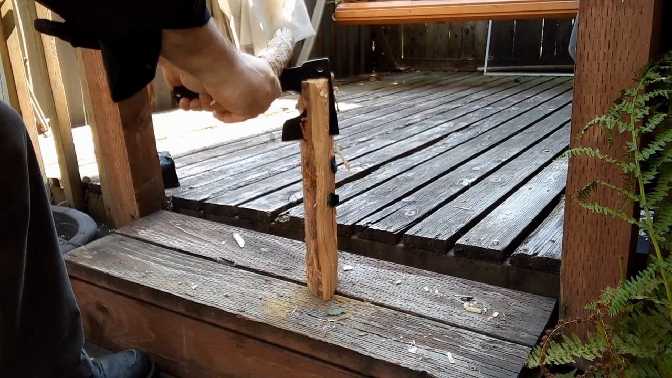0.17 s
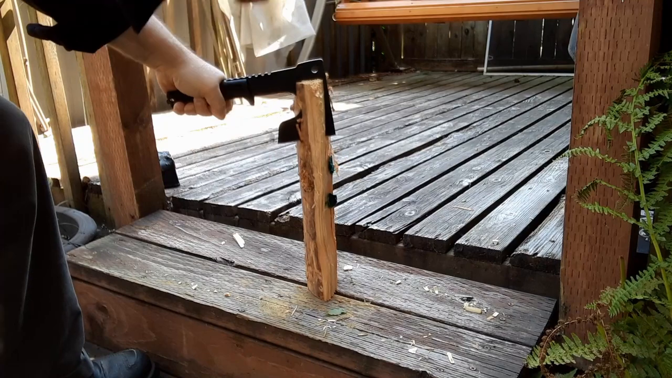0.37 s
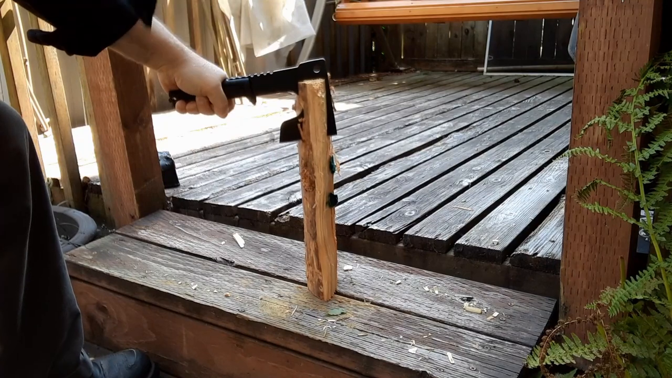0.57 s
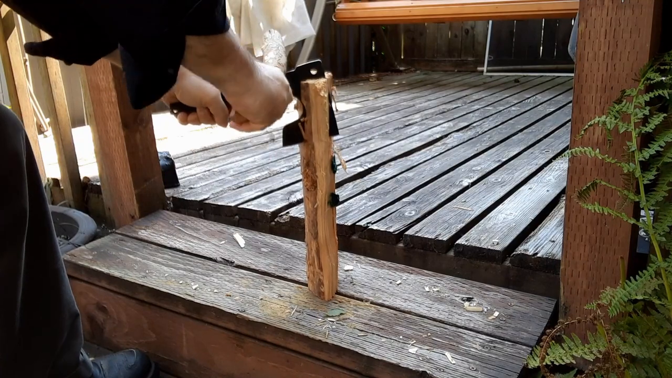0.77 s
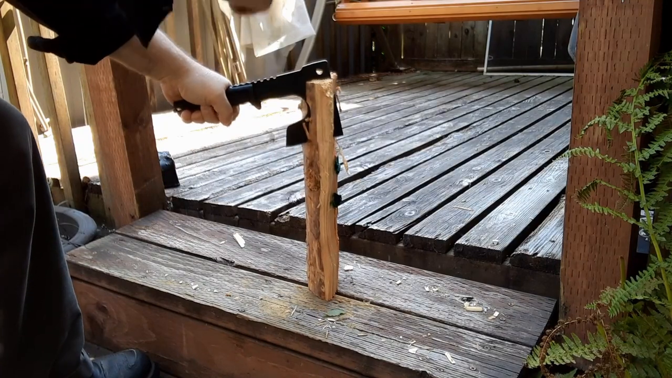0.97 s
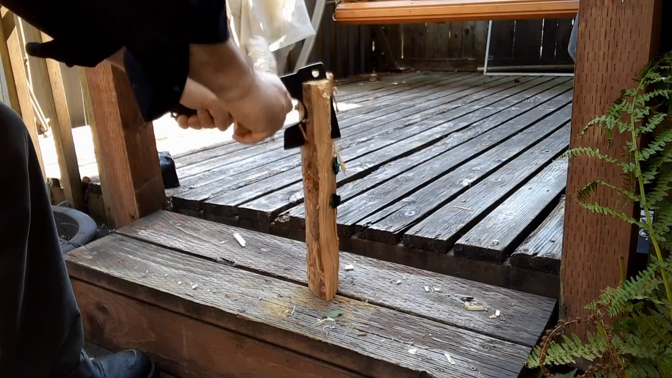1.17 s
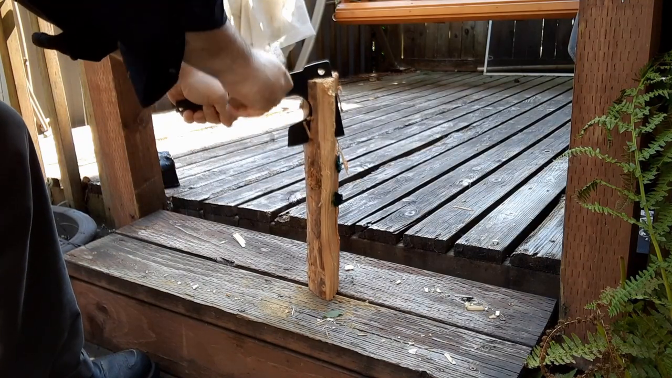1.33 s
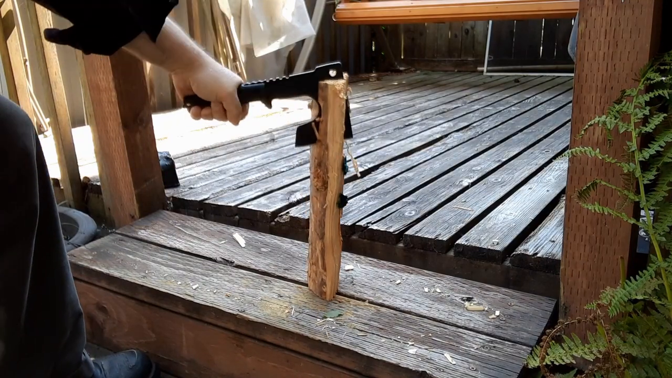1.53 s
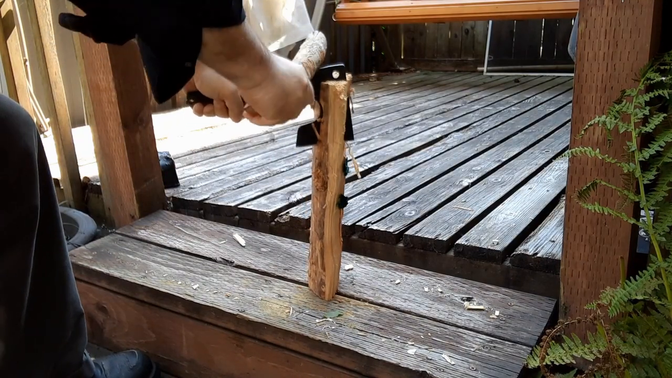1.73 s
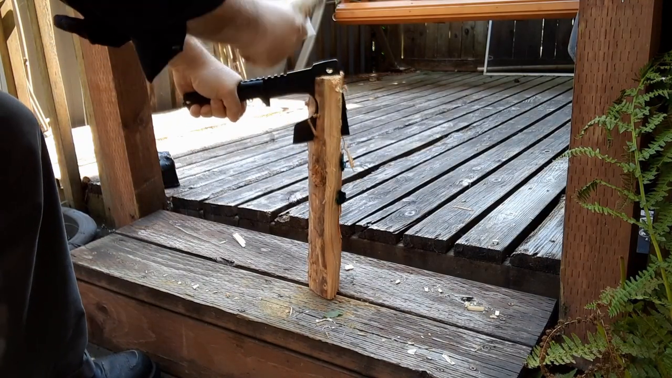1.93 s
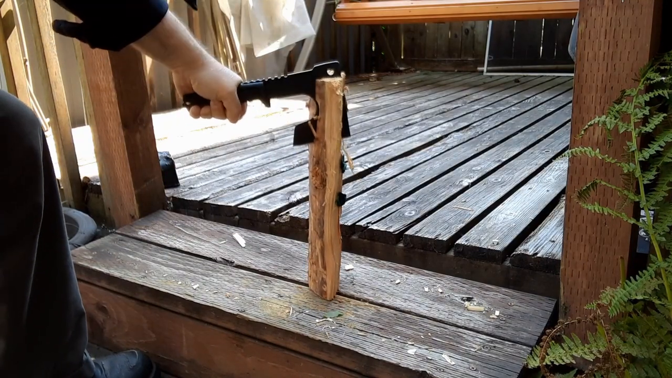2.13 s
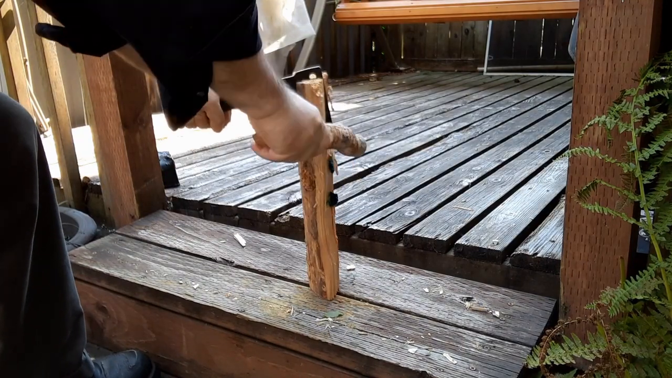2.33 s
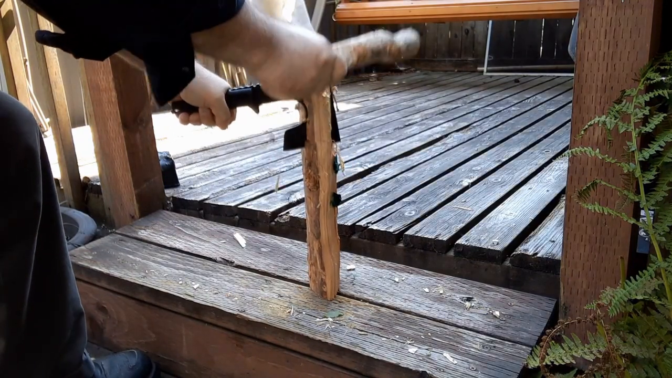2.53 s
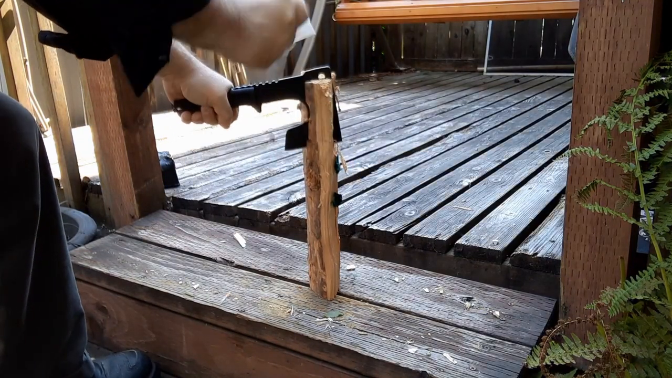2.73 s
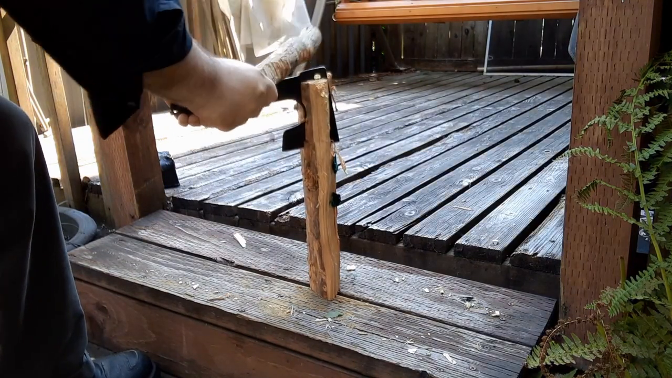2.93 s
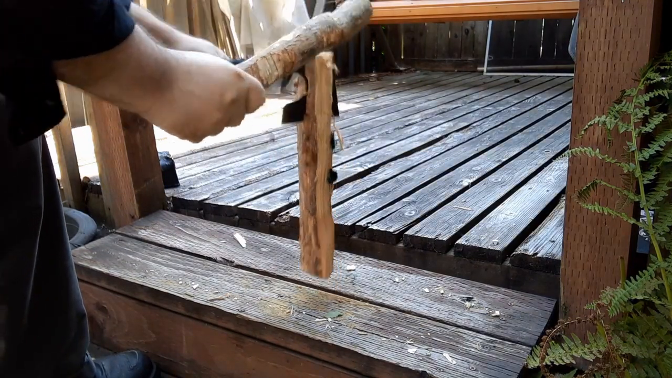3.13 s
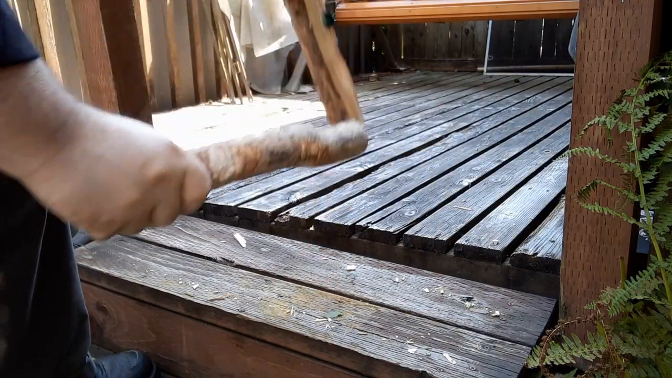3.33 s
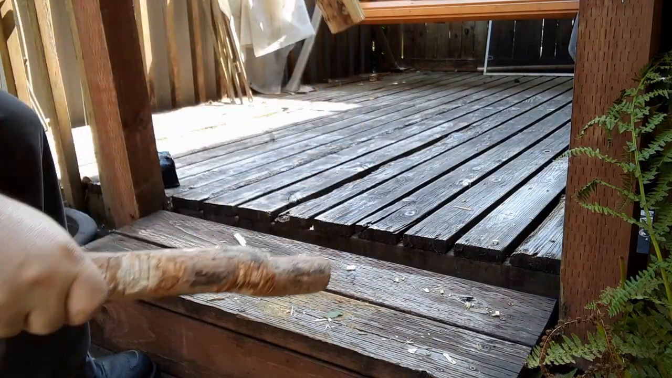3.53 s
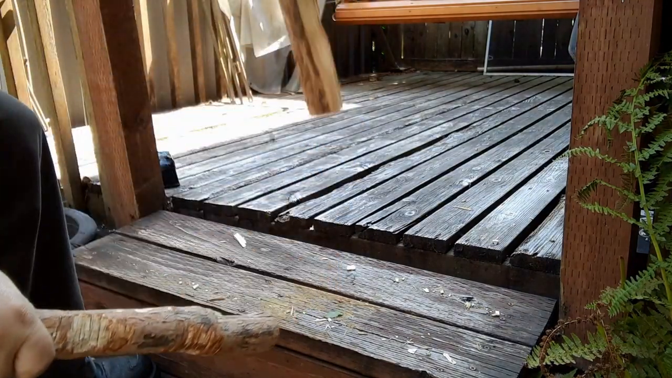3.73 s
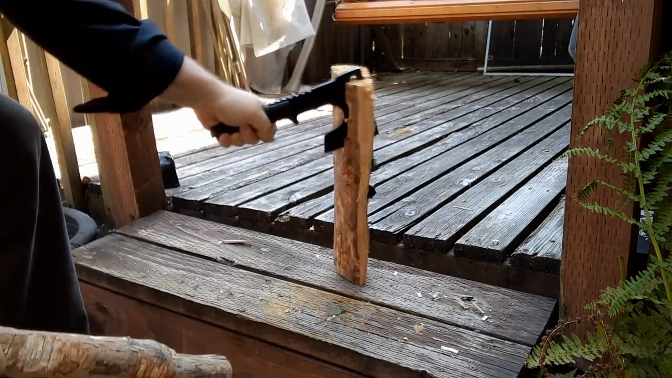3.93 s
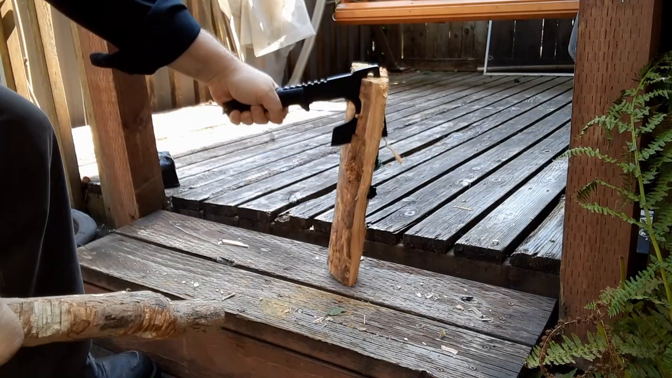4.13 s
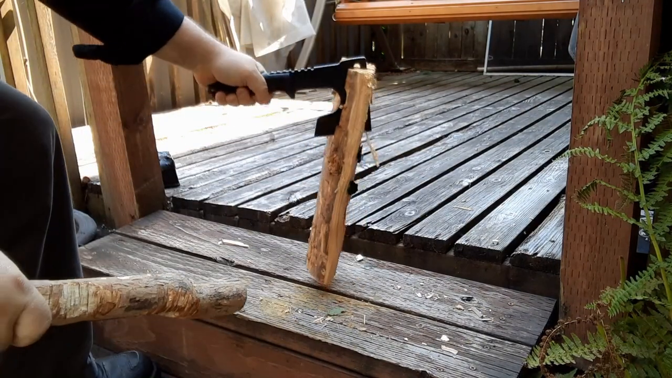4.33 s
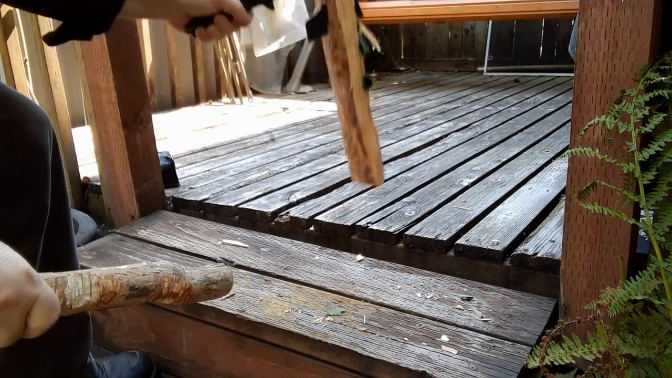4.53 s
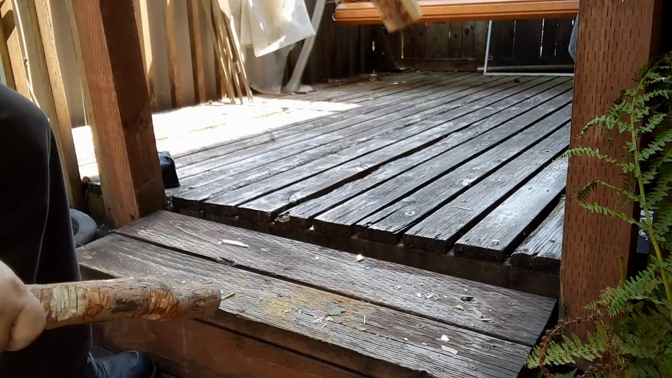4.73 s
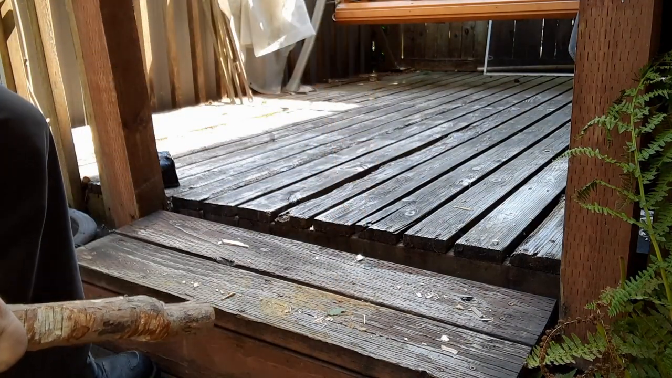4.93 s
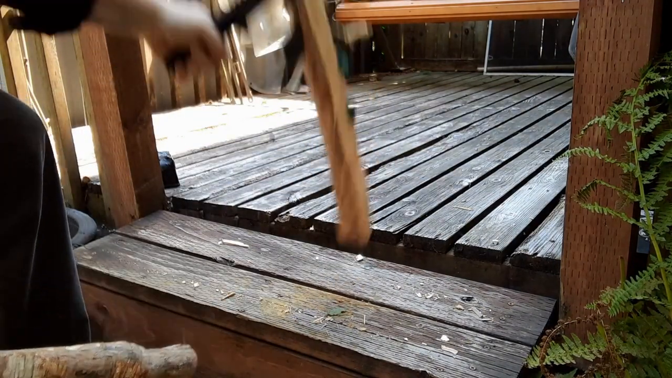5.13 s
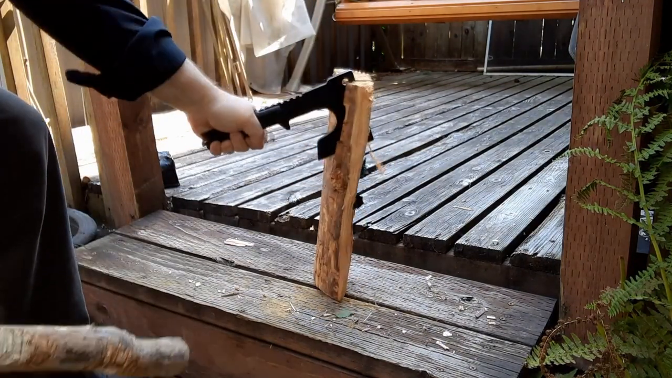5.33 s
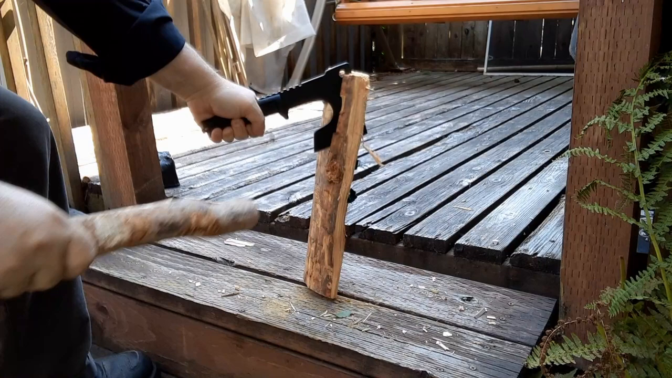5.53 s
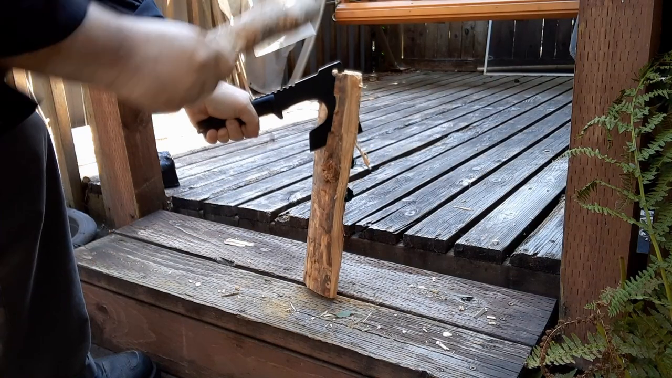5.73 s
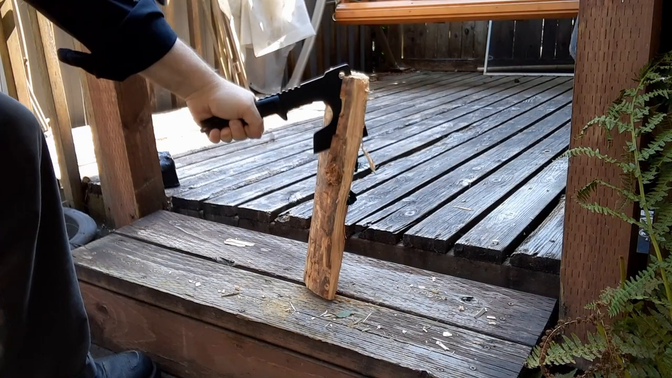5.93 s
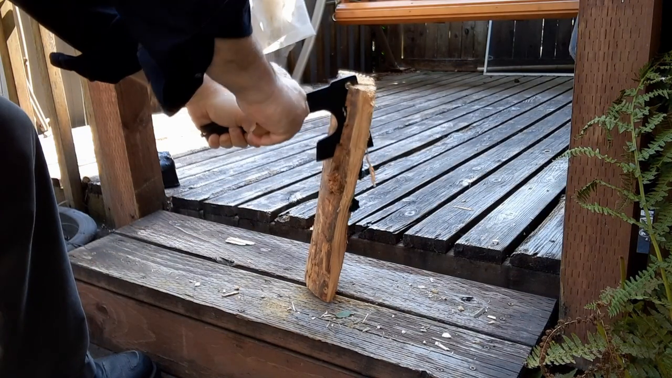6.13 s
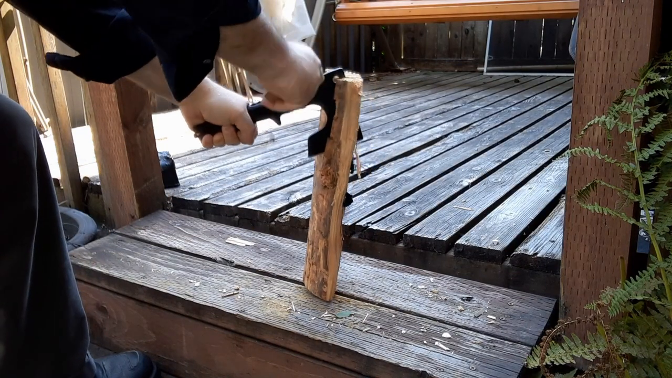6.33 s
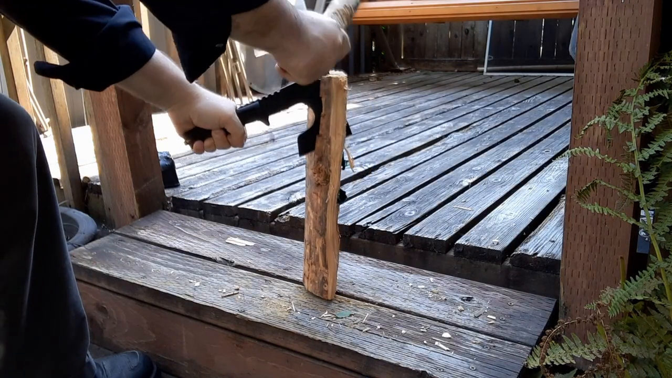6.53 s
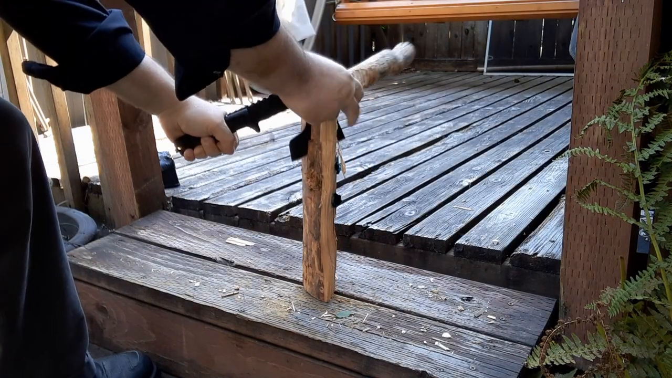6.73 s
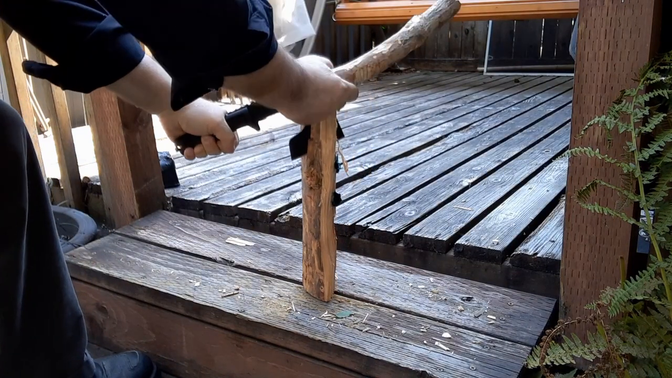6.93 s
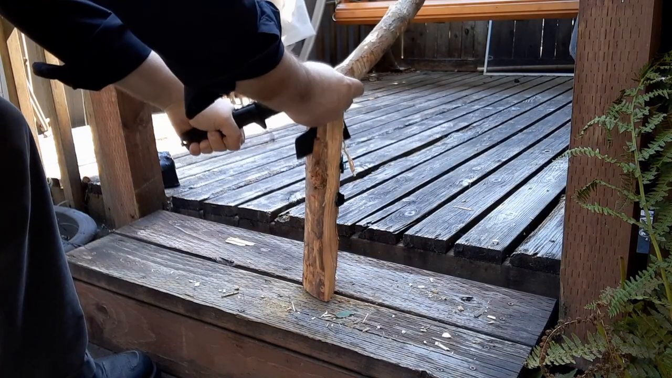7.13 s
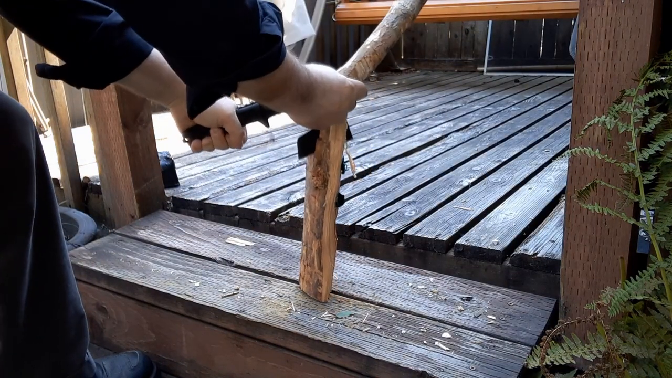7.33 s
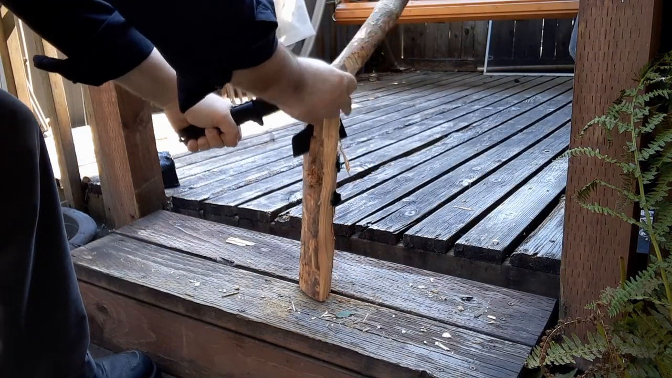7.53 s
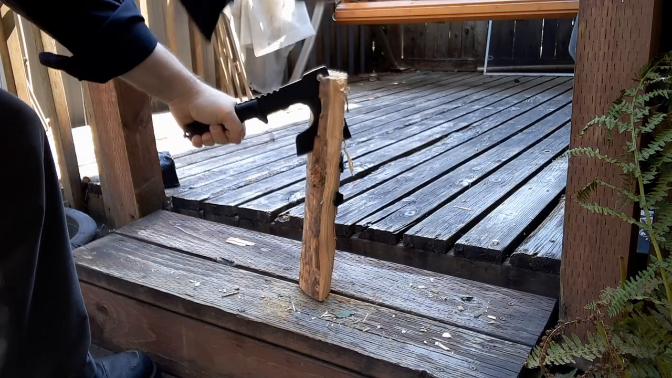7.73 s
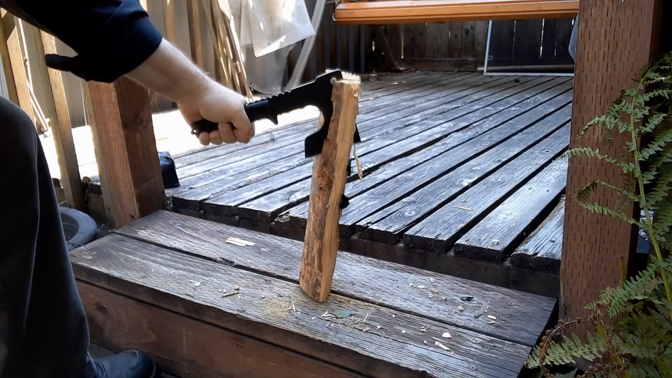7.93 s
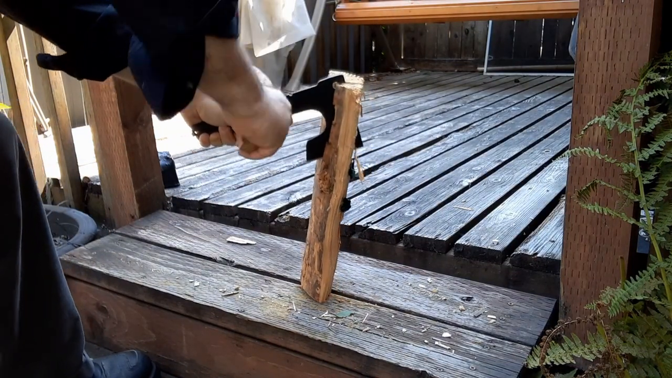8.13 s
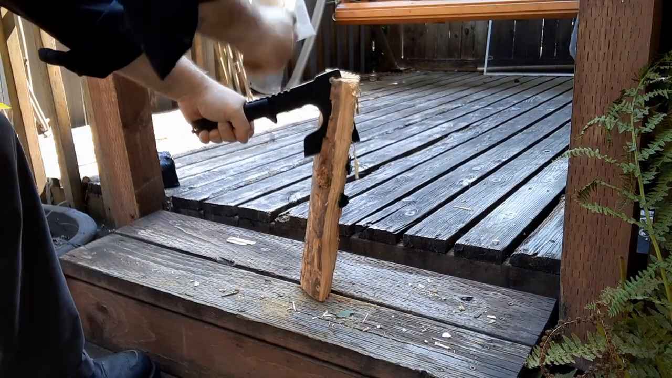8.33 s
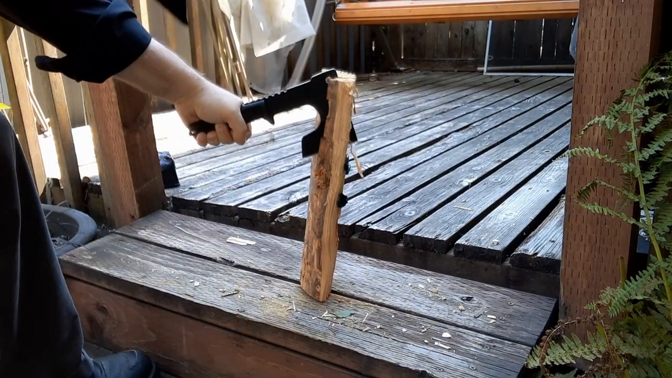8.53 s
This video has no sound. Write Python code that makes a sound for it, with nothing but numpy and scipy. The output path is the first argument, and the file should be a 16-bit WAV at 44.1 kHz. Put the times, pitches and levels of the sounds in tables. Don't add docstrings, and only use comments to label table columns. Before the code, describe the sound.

Outdoors at a hollow porch step, heard close on a small stereo camera. A branch beats a hatchet into an upright softwood stick: hard, dry clacks with cracking fibres and a low board boom at 0.2, 0.8, 1.3, 1.8, 2.4 and 2.9 s. The first three are loudest and the later ones duller; light taps of the rebounding branch follow, firmest at 2.5, and a stick knock joins the 2.4 blow. Splinters snap brightly at 2.65, 3.1 and 3.65. At 4.0 the stick end drops with a hollow knock and small bounces, then again at 5.3, pattering out by 5.6. Another blow lands at 6.2, small ticks and rustles follow, a sharp snap at 8.0, and a last strong clack at 8.25 with a tiny tap. Faint traffic hiss and low engine drone continue throughout, the drone swelling after 7 s. Echoes are short, with a faint yard tail.

```python
import sys
import numpy as np
from scipy import signal
from scipy.fft import rfft, irfft, next_fast_len
from scipy.io import wavfile
from scipy.ndimage import uniform_filter1d, map_coordinates

SR = 44100
rng = np.random.default_rng(int(sys.argv[2]) if len(sys.argv) > 2 else 0)


def boost(x):
    u = np.asarray(x, float) / 20
    return 10 ** u


def file_out(sig):
    cols = np.atleast_2d(sig).T
    lim = np.clip(cols, -1, 1)
    pcm = np.round(lim * 32767).astype(np.int16)
    wavfile.write(sys.argv[1], SR, pcm)


N = 383226
SPAN = SR // 2

# [t/s, level/dB]
ENGINE_LEVEL = [(0.0, -58), (0.26, -47), (0.58, -52), (0.92, -52), (1.64, -63), (1.91, -55), (2.71, -58.5),
                (3.63, -43), (3.95, -47), (4.16, -55.5), (4.84, -66.5), (5.39, -53), (5.76, -62.5),
                (7.21, -36), (7.5, -34.5), (8.03, -37), (8.35, -45), (8.69, -47.5)]
# [f/Hz, width/Hz, level/dB]
ENGINE_ORDERS = [(90.9, 27, 0.5), (58, 16, -7.5), (175, 11, -17.5)]
# [t/s, level/dB]
TRAFFIC_LEVEL = [(0.0, -55), (1.62, -53.5), (3.34, -54), (4.09, -52), (4.33, -60), (4.55, -67),
                 (5.23, -65), (5.44, -52), (5.61, -61.5), (5.98, -66.5), (6.66, -59.5), (6.92, -53.5),
                 (7.96, -48.5), (8.28, -48), (8.45, -53), (8.69, -57)]
# [f/Hz, level/dB per Hz]
RUMBLE_COLOUR = [(20, -41), (35, -21), (60, 7), (110, -1.5), (180, -11.5), (300, -24), (500, -51)]
# [f/Hz, level/dB per Hz]
TYRE_COLOUR = [(120, -34), (200, -7.5), (265, -12), (400, -5.5), (1010, 0), (2580, -20), (3400, -37),
               (5000, -94.5)]
RUMBLE_DB, RUMBLE_DB_PER_S, GUST_DB = 9, -0.5, 3.5

# [t/s of the peak, level/dB, swell/s, fade/s]
RUSTLES = [(.425, -59, 0.018, 0.018), (.89, -44, .02, 0.026), (1.07, -65.5, 0.052, 0.033),
           (3.01, -51.5, 0.016, .03), (6.75, -71.5, .15, .2), (7.57, -66, .05, .04),
           (8.51, -72.5, .04, .15), (3.68, -61, 0.013, .12), (3.97, -67, 0.11, .02),
           (4.1, -64.5, .02, 0.13), (4.24, -65, 0.032, .04), (4.33, -69.5, .03, 0.11),
           (5.42, -65, .02, 0.038), (5.56, -61.5, .12, 0.036), (6.87, -72, .04, .03),
           (6.931, -64, 0.038, .02), (7.29, -75, 0.016, 0.13), (7.499, -56.5, 0.055, .04),
           (7.676, -44.5, 0.014, .02), (7.75, -60.5, 0.13, 0.038), (8.02, -62, 0.015, .03),
           (8.085, -71, .02, 0.013)]

# [t/s, peak level/dB, ping f/Hz, ping level/dB, left-right level/dB]
SPLINTERS = [(0.3924, -59, 2206, -7, -1), (1.6318, -46, 3040, 6.5, -3.5), (2.0144, -57, 2320, 18, -3),
             (2.6459, -26.5, 3420, -3.5, 2.5), (2.7252, -41.5, 3430, -1.5, 4),
             (3.0689, -26.5, 2880, -43, 1), (3.1822, -60, 2914, -17, 3), (3.6471, -21.5, 2810, -1, 1.5),
             (3.9534, -56, 3360, 15.5, -14), (5.4014, -63.5, 3350, 23.5, 14), (6.318, -51.5, 2650, 17, -2),
             (6.3899, -62, 2620, 9, -4), (6.8644, -62, 2710, 12, -15.5), (7.4505, -55, 2410, -21, -8.5),
             (7.4739, -51, 2420, 2, 2.5), (7.6725, -35, 2250, -15, 3), (7.9718, -19.5, 3070, -6.5, -0.5)]
# [f/Hz, level/dB per Hz]
SNAP_COLOUR = [(700, -38), (1400, -11.5), (2500, -3.5), (4000, -8), (7000, -4), (10000, -5), (12000, -13),
               (16500, -14)]
TOP_DB, TOP_PER_PING = 0.5, -0.2

# [t/s, level/dB, f/Hz, width/Hz, t60/s]
SHIVERS = [
    (.29, -41.5, 2174, 90.3, 0.46),
    (4.06, -37.5, 1160, 140, 0.58),
    (5.4, -38.5, 1140, 180, 0.47),
    (5.55, -40, 240, 42, 0.13),
    (4.31, -43, 490, 99, 0.22),
    (4.2, -51, 220, 250, 0.84),
    (5.51, -39.5, 180, 100, 0.39),
]

# [t/s, peak level/dB, boom level/dB, second board level/dB, stick level/dB, all three over the first board]
DRIVEN_FOOT = [
    (0.216, -18, -6.5, 3.5, -2),
    (0.781, -22, -2, -1, 5),
    (1.308, -18, -4.5, -6, 4),
    (1.838, -13, -9.5, -2.5, -2.5),
    (2.384, -19, -2.5, 4.5, 7),
    (2.493, -35, -6, 1, 8.5),
    (2.945, -15.5, -9.5, -1.5, -0.5),
    (6.215, -22, -5.5, -3.5, 0.5),
    (8.254, -15, -10.5, -3, -1.5),
]
FOOT_LANDINGS = [
    (2.396, -18.5, -12, -1.5, -21.5),
    (2.999, -36, 2.5, 3, 1.5),
    (4.0, -12.5, -15, -8, -7.5),
    (4.071, -34, -3.5, 1, -4),
    (5.313, -12.5, -14, -2.5, -10.5),
    (5.377, -34, 0, 2.5, -4.5),
]
# [f/Hz, level/dB, t60/s]
BOOM_MODES = [(78, -3, .2), (122, -1.5, 0.25), (162.3, 5, 0.16), (205, -5.5, .15), (233, -3.5, 0.22),
              (271, -8, 0.25)]
# [f/Hz, level/dB, t60/s]
BOARD_MODES = [(344, -2.5, 0.061), (358, -10, 0.064), (381, -1, 0.046), (481, 2.5, 0.067)]
# [f/Hz, level/dB, t60/s]
PLANK_MODES = [(571, 0.5, 0.12), (624, 6, 0.043), (718.5, -10.5, 0.19), (796, -7, 0.098), (884, -12, 0.11)]
# [f/Hz, level/dB, t60/s]
STICK_MODES = [(1001, -4.5, 0.083), (1097, -4, 0.077), (1188, -8, 0.15), (1226, -12.5, 0.14),
               (1313, -4.5, 0.056), (1491, -10.5, 0.11), (1710, 0.5, 0.034)]
DRIVEN_SUSTAIN, LANDED_SUSTAIN = 0.72, 0.51

# [t/s, peak level/dB, clack f/Hz, fibre crack level/dB over the clack, echo level/dB]
BRANCH_BLOWS = [
    (0.2163, -2, 2164, -29.5, -1.5),
    (0.7827, -0.5, 2286, -22.5, -1),
    (1.3074, -2.5, 2100, -17, -0.5),
    (1.8372, -10.5, 2443, -18.5, 2.5),
    (2.3859, -8, 1900, -12, -8),
    (2.9449, -13.5, 2466, -17.5, 0.5),
    (6.2135, -8.5, 2494, -21, -3),
    (8.2552, -2.5, 2269, -25.5, 0.5),
]
# [t/s, peak level/dB, clack f/Hz, crack level/dB]
BRANCH_REBOUNDS = [
    (0.2704, -31.5, 2230, -16),
    (0.8849, -34, 2210, -12.5),
    (1.4102, -32.5, 2060, -16.5),
    (1.9402, -37.5, 2632, -13.5),
    (2.4939, -16.5, 2202, -22),
    (3.002, -31.5, 3400, -13.5),
    (8.3587, -30, 2690, -26),
]
# [t/s, peak level/dB, knock f/Hz]
STICK_DROPS = [
    (2.4, -7, 943),
    (4.002, -4.5, 1130),
    (4.075, -26.5, 1000),
    (4.18, -38.5, 1190),
    (5.314, -5.5, 1105),
    (5.3776, -18.5, 1040),
    (5.493, -35, 1190),
    (5.605, -49, 1030),
]
# [multiple of the pitch, level/dB, share of t60]
CLACK_PARTIALS = [(1, -1, 1), (.74, -8, 0.25), (1.3, -11, .35)]
# [multiple of the pitch, level/dB, share of t60]
KNOCK_PARTIALS = [(1, 0.2, 1.5), (0.57, -2.2, 2.2), (1.3, -2.2, 1.7)]
# [f/Hz, level/dB per Hz]
FIBRE_COLOUR = [(900, -45), (1600, -19.5), (2600, 2), (3600, -1), (7000, 0.5), (10000, 0), (12000, -6),
                (16500, -31)]
# [f/Hz, level/dB per Hz]
CLATTER_COLOUR = [(150, -29.5), (400, -2.5), (1000, 2), (2200, -8), (3500, -17), (6000, -23), (11000, -31),
                  (16500, -45.5)]
CLACK_T60_S, KNOCK_T60_S = 0.014, 0.019
SPLIT_DB, DOUBLING_DB = -21.5, 11.5
REBOUND_ECHO_DB = -1
DROP_CRACK_DB, DROP_ECHO_DB = -33, -2

# [f/Hz, left-right likeness]
PORT_LIKENESS = [(60, 0.99), (200, 0.93), (400, 0.97), (700, 0.48), (1400, 0.49), (3000, 0.033),
                 (15000, .05)]
# [f/Hz, t60/s]
PORCH_DECAY = [(100, .3), (500, 0.13), (1500, 0.087), (4000, .13), (12000, 0.02)]
# [f/Hz, t60/s]
YARD_DECAY = [(100, 0.99), (1000, 0.58), (4000, 0.96), (12000, 0.35)]

# [f/Hz, level/dB under the sound]
FRAME_NOISE = [(100, -31.5), (1000, -29), (3000, -18.5), (8000, -8.5), (16000, -7.5)]
# [f/Hz, level/dB per bin]
TREBLE_GATE = [(2800, -140), (3600, -107), (8000, -107), (16000, -109)]
HOP, LEAD = 941, 930
MIC_HZ, TOP_HZ = 42.8, 16300


def unit(x):
    return x / np.sqrt(np.mean(x ** 2) + 1e-20)


def along(points, hz):
    f, v = np.transpose(points)
    return np.interp(np.log(hz + 1), np.log(f + 1), v)


def level_curve(rows):
    s, db = np.transpose(rows)
    return np.interp(np.arange(N) / SR, s, db, -120, -120)


def filtered(x, response):
    m = next_fast_len(x.shape[-1] + 4096)
    return irfft(rfft(x, m) * response(np.fft.rfftfreq(m, 1 / SR)), m)[..., :x.shape[-1]]


def ports(pair):
    def mid_side_gains(hz):
        turn = np.arccos(np.clip(along(PORT_LIKENESS, hz), -1, 1)) / 2
        return np.array([np.cos(turn), np.sin(turn)])

    mid, side = filtered(pair, mid_side_gains)
    return np.array([mid + side, mid - side])


def noise(gain, size, patchy_db=0):
    z = signal.stft(rng.standard_normal((2, size)), nperseg=512)[2]
    field = uniform_filter1d(rng.standard_normal(z.shape[1:]), 5, 0)
    field = uniform_filter1d(field, 10, 1)
    pair = signal.istft(z * boost(patchy_db * unit(field)), nperseg=512)[1][:, :size]
    return unit(ports(filtered(pair, gain)))


def tail(decay):
    hz, t, z = signal.stft(rng.standard_normal((2, SPAN)), SR, nperseg=128)
    fading = z * boost(-60 * t / along(decay, hz)[:, None])
    echo = ports(signal.istft(fading, SR, nperseg=128)[1][:, :SPAN])
    return echo / np.linalg.norm(echo[0])


def ring(modes, rise, sustain=1):
    t = np.arange(SPAN) / SR
    hz, db, t60 = np.transpose(modes)[:, :, None]
    mid_phase = np.pi * np.arange(len(modes))[:, None]
    phase = np.array([mid_phase, 2 * np.pi * rng.random(hz.shape)])
    level = boost(db + rng.normal(0, 1.5, hz.shape) - 60 * t / (t60 * sustain))
    pair = np.sum(level * np.sin(2 * np.pi * hz * t + phase), axis=1)
    return ports(pair) * (1 - np.exp(-t / rise))


def empty_track():
    return np.zeros((2, N + SPAN)), np.arange(SPAN) / SR


def add(track, sound, s, near_db, far_db):
    mono = sound.mean(axis=0)[None, :SPAN // 2]
    porch = boost(near_db) * np.pad(tail(PORCH_DECAY), ((0, 0), (60, 0)))
    yard = boost(far_db) * np.pad(tail(YARD_DECAY), ((0, 0), (0, 60)))
    wet = signal.fftconvolve(mono, porch + yard, axes=1)[:, :SPAN]
    track[:, round(s * SR):][:, :SPAN] += sound + wet


def traffic():
    t = np.arange(N) / SR
    drone_db, hiss_db = level_curve(ENGINE_LEVEL), level_curve(TRAFFIC_LEVEL)
    gusts = map_coordinates(rng.standard_normal(70), [7 * t])
    rumble_db = hiss_db + RUMBLE_DB + RUMBLE_DB_PER_S * t + GUST_DB * gusts

    def orders(f):
        return sum(boost(db) / (1 + (2 * (f - centre) / width) ** 2) for centre, width, db in ENGINE_ORDERS)

    tone = np.sqrt(2) * np.sin(2 * np.pi * ENGINE_ORDERS[0][0] * t)
    drone = boost(drone_db + 3.5) * (tone + boost(-7.5) * noise(orders, N))
    rumble = boost(rumble_db) * noise(lambda f: boost(along(RUMBLE_COLOUR, f)), N)
    hiss = boost(hiss_db + 2.0) * noise(lambda f: boost(along(TYRE_COLOUR, f)), N, patchy_db=-2)
    return drone + rumble + hiss


def sleeve():
    t = np.arange(N) / SR
    gain = boost(-88)
    for s, db, swell, fade in RUSTLES:
        gain = gain + boost(db - 20 * np.maximum((s - t) / swell, (t - s) / fade))
    return gain * noise(lambda f: boost(along(SNAP_COLOUR, f)), N, patchy_db=2.0)


def splinters():
    track, t = empty_track()
    for s, db, hz, ping_db, pan_db in SPLINTERS:
        top_db = TOP_DB + TOP_PER_PING * ping_db
        colour = lambda f: boost(along(SNAP_COLOUR, f) + top_db * np.clip(f / 9000 - 0.6, 0, 1))
        snap = noise(colour, SPAN) * boost(-1.5 - 60 * t / 0.015)
        partials = [(hz, 0, 0.012), (hz * 0.28, -8, 0.01), (hz * 0.5, -10, 0.015)]
        ping = boost(ping_db) * ring(partials, rise=0.00012)
        pan = boost(db + pan_db * np.array([[0.5], [-0.5]]))
        add(track, (snap + ping) * pan, s, near_db=-8.0, far_db=-27.0)
    return track[:, :N]


def shiver():
    track, t = empty_track()
    for s, db, hz, width_hz, t60 in SHIVERS:
        hum = noise(lambda f: 1 / (1 + (2 * (f - hz) / width_hz) ** 2), SPAN)
        swell = 1 - np.exp(-t / 0.028)
        track[:, round(s * SR):][:, :SPAN] += hum * boost(db - 60 * t / t60) * swell
    return track[:, :N]


def step():
    track, t = empty_track()
    hits = [(*row, DRIVEN_SUSTAIN) for row in DRIVEN_FOOT]
    hits += [(*row, LANDED_SUSTAIN) for row in FOOT_LANDINGS]
    for s, db, boom_db, plank_db, stick_db, sustain in hits:
        board = ring(BOARD_MODES, 0.0024, sustain)
        plank = boost(plank_db) * ring(PLANK_MODES, 0.0023, sustain)
        boom = boost(boom_db - 1.0) * ring(BOOM_MODES, 0.003, sustain)
        stick = boost(stick_db - 2.0) * ring(STICK_MODES, 0.0003, sustain)
        thud = noise(lambda f: f / (1 + (f / 450) ** 4), SPAN)
        thud = thud * boost(-12.5 - 60 * t / (0.2 * sustain)) * (1 - np.exp(-t / 0.0026))
        sound = board + plank + thud + boom + stick
        add(track, boost(db + 4.5) * sound, s + 0.0015, near_db=-6, far_db=-25.0)
    return track[:, :N]


def blows():
    track, t = empty_track()
    contacts = []
    for row in BRANCH_BLOWS:
        t60 = CLACK_T60_S * 2 ** ((row[3] - SPLIT_DB) / DOUBLING_DB)
        contacts.append((*row, t60, CLACK_PARTIALS))
    contacts += [(*row, REBOUND_ECHO_DB, CLACK_T60_S, CLACK_PARTIALS) for row in BRANCH_REBOUNDS]
    contacts += [(*row, DROP_CRACK_DB, DROP_ECHO_DB, KNOCK_T60_S, KNOCK_PARTIALS) for row in STICK_DROPS]
    for s, db, hz, crack_db, echo_db, t60, partials in contacts:
        clack = ring([(hz * k, level, share * t60) for k, level, share in partials], rise=0.0003)
        squash = (1 - np.exp(-t * hz / 0.9)) ** 2
        crunch = noise(lambda f: 1 / (1 + ((f - hz) / (0.5 * hz)) ** 2), SPAN)
        crunch = crunch * boost(-3 - 60 * t / (1.3 * t60))
        rattling = boost(-21.5 - 60 * t / 0.17) + boost(-34.5 - 60 * t / 0.6)
        clatter = noise(lambda f: boost(along(CLATTER_COLOUR, f)), SPAN, patchy_db=4)
        clatter = clatter * boost(echo_db) * rattling
        tearing = boost(-60 * t / 0.024) + boost(-15.5 - 60 * t / 0.17) + boost(-31 - 60 * t / 0.6)
        crack = noise(lambda f: boost(along(FIBRE_COLOUR, f)), SPAN) * boost(crack_db - 0.5) * tearing
        sound = clack + squash * (crunch + clatter) + crack
        add(track, boost(db + 0.5) * sound, s, near_db=echo_db - 10, far_db=echo_db - 20)
    return track[:, :N]


def scene():
    mix = traffic() + sleeve() + splinters() + shiver() + step() + blows()
    return mix * boost(np.array([[0.4], [-0.4]]))


def frame_smear(x):
    frame = dict(window="cosine", nperseg=2 * HOP, noverlap=HOP)
    hz, _, z = signal.stft(np.pad(x, ((0, 0), (LEAD, 0))), SR, **frame)
    band = np.sqrt(np.abs(uniform_filter1d(np.abs(z) ** 2, size=24, axis=1)))
    random_phase = np.exp(2j * np.pi * rng.random(z.shape))
    hiss = band * boost(along(FRAME_NOISE, hz))[:, None] * random_phase
    block = np.arange(len(hz)) // 24 * 24
    luck = boost(3.5 * rng.standard_normal(z.shape[1:]))[block]
    bass_db = 20 * np.log10(np.abs(z[0, :12]).max(axis=0) + 1e-9)
    busy = boost(np.clip(bass_db + 50.5, 0, 9))
    threshold = busy * boost(along(TREBLE_GATE, hz))[:, None]
    kept = np.clip(4 * band[:, block] * luck / threshold - 3, 0.02, 1)
    return signal.istft((z + hiss) * kept, SR, **frame)[1][:, LEAD:LEAD + N]


def low_pass(x):
    return signal.sosfilt(signal.butter(12, 16810, fs=SR, output="sos"), x)


def record(dry):
    x = filtered(dry, lambda hz: (1j * hz / (MIC_HZ + 1j * hz)) ** 2)
    x = x / (1 + np.abs(x) ** 6) ** (1 / 6)
    x = filtered(frame_smear(x), lambda hz: hz < TOP_HZ)
    return low_pass(x)


dry = scene()
out = record(dry)
file_out(out)
```